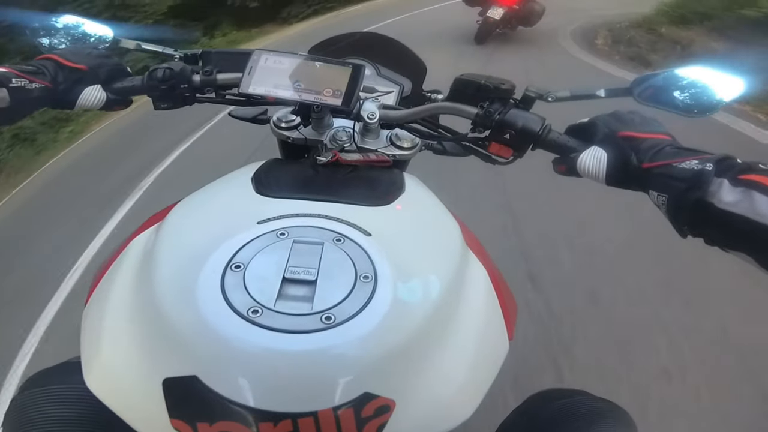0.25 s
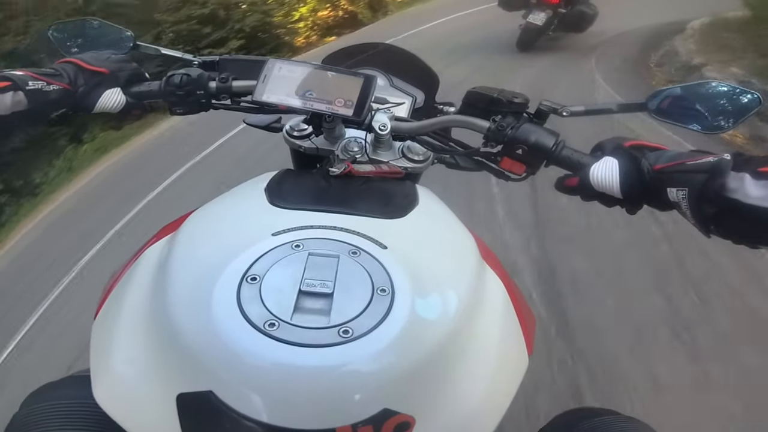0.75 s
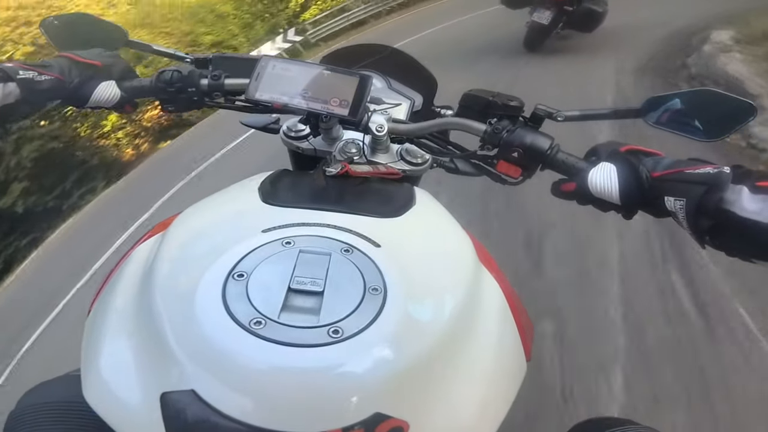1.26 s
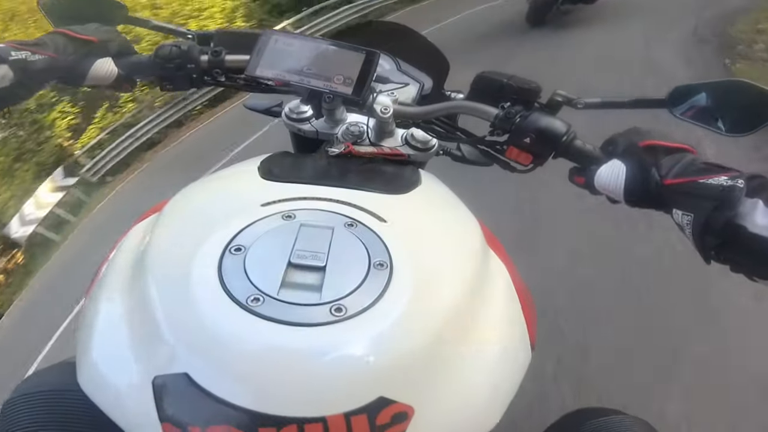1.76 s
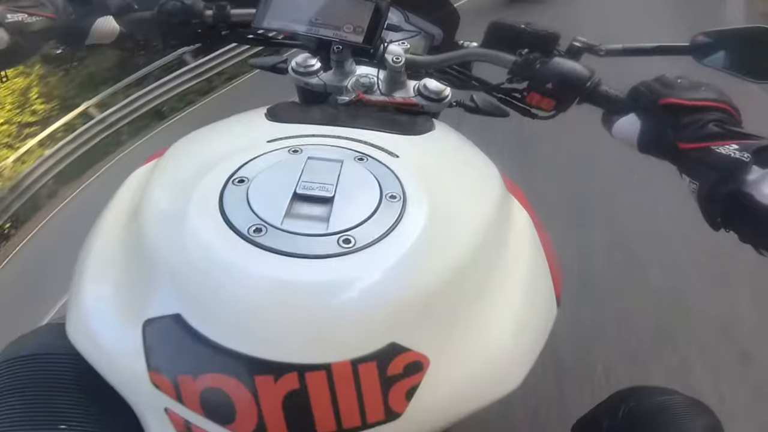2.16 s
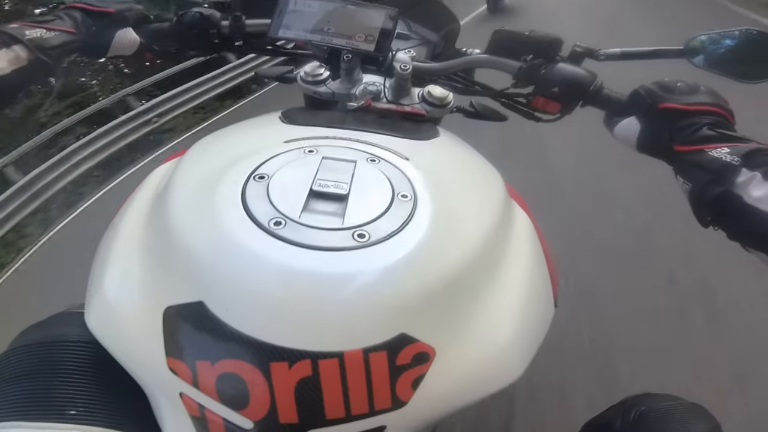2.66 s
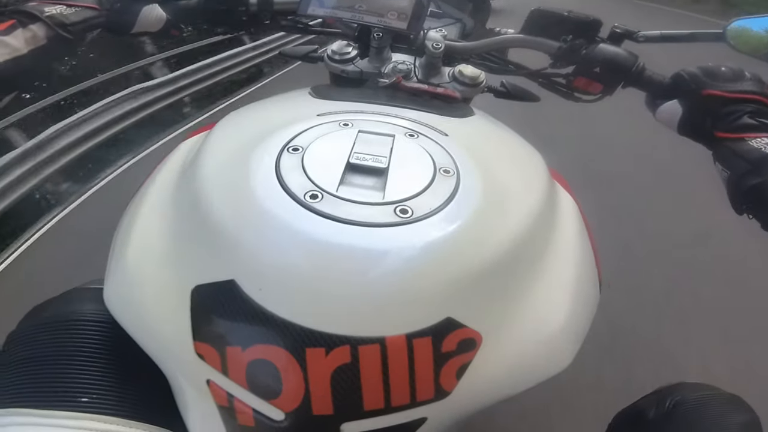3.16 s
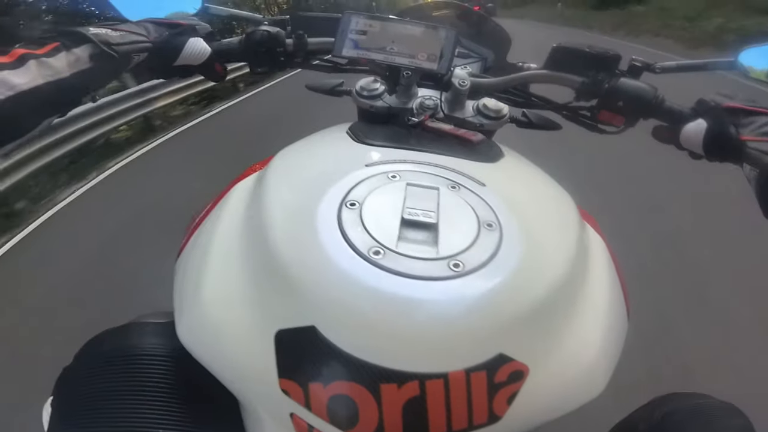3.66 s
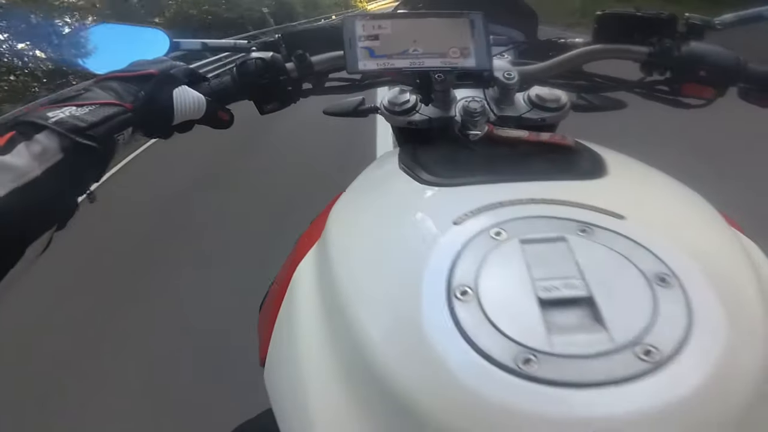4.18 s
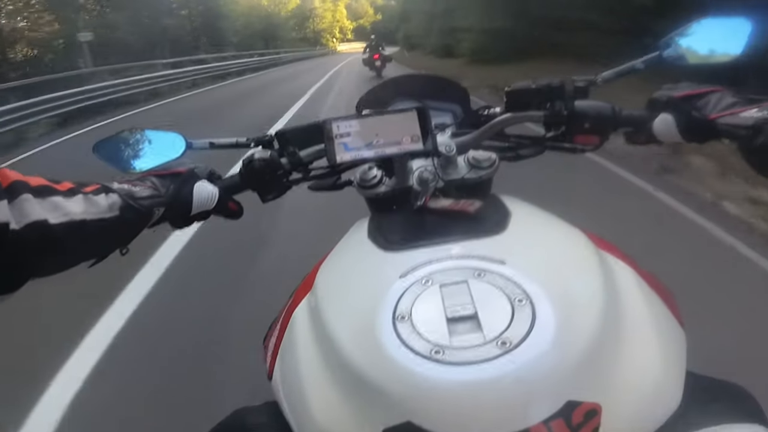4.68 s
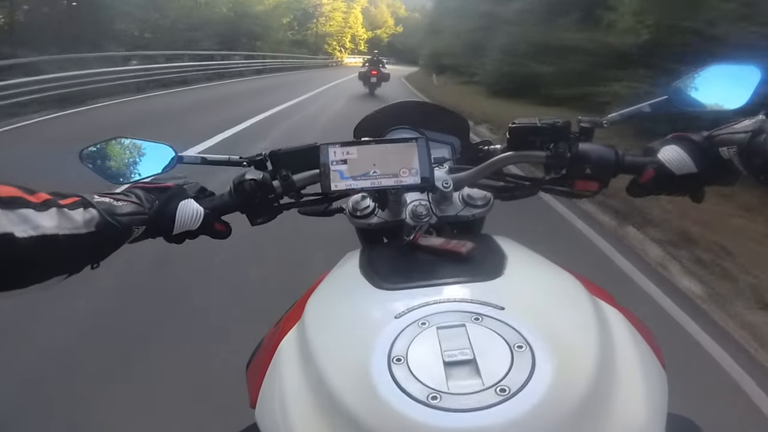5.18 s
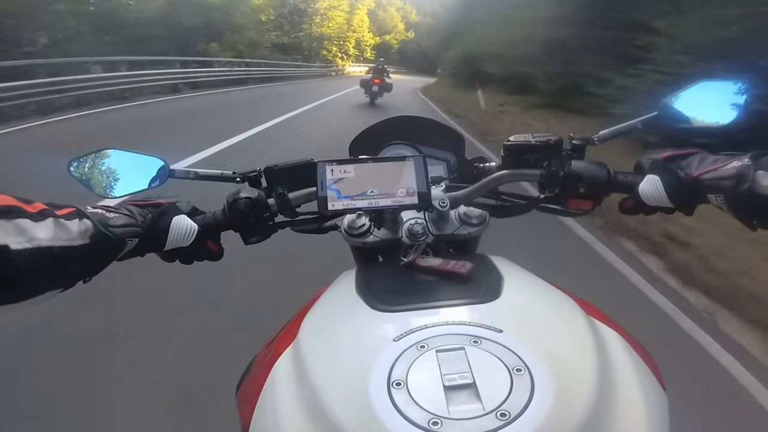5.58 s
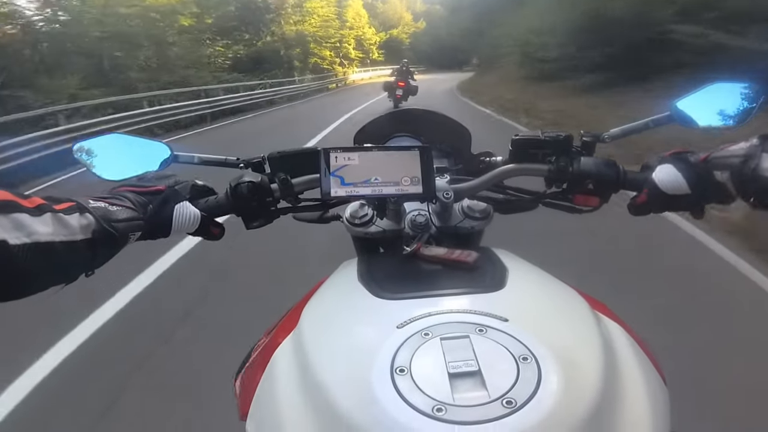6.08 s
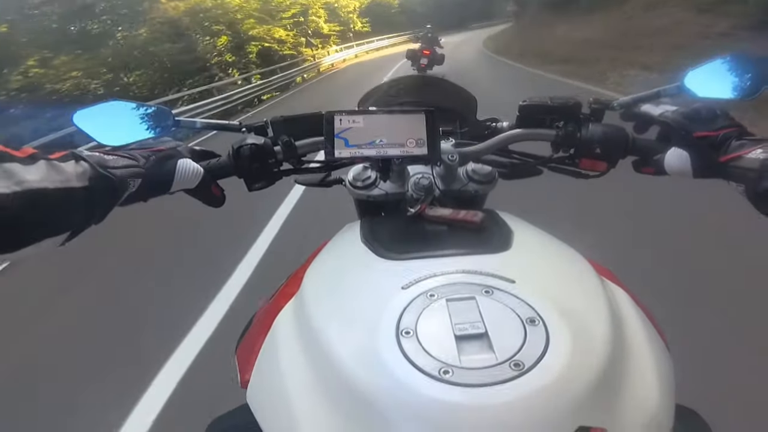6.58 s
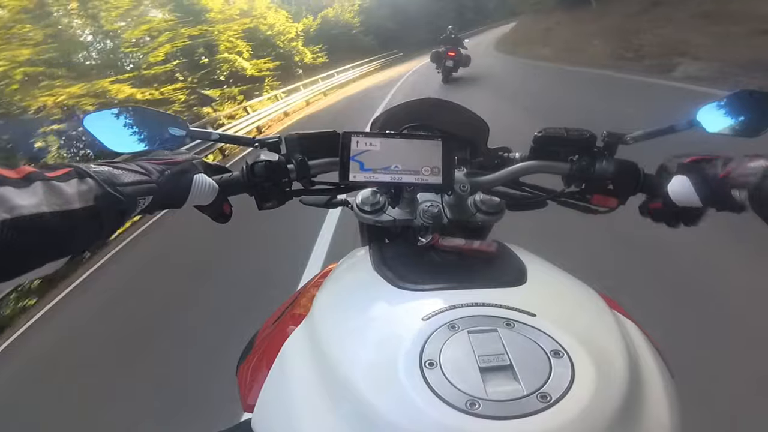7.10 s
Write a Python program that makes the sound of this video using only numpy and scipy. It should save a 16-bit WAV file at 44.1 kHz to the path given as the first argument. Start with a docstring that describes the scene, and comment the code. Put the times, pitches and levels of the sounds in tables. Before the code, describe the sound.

A four-cylinder motorcycle is heard from the rider's chest on a mountain road. It starts coasting at low revs, and from 0.5 to 2 seconds it stumbles and coughs in hollow thumps. Around 2 seconds it pulls hard, with two faint metallic clanks. Its deep intake throb rises steadily in pitch until 5 seconds, overloading the microphone, over valve clatter, hissing air and a growing roar of wind and tyres. A twin-cylinder bike close by accelerates alongside it from about 2 seconds, with exhaust cracks between 3.3 and 4 seconds. A quick run of tiny sharp ticks comes at 4.3 seconds. At 5 seconds the throttle eases with a short burble, and the engine cruises, its pitch sinking slightly, with gear whine more noticeable. From 6.8 seconds the second bike barks and cracks again until the end, just past 7 seconds.

```python
"""A mountain road, heard from the chest of a rider on a four-cylinder V-engine motorcycle.
The bike coasts and coughs through a bend, pulls hard, then cruises on a light throttle. Its intake
throbs through the airbox, loud enough to overload the microphone; valves clatter, gears whine, and
wind and tyres roar underneath. Close by, a twin-cylinder bike barks through its pipe as it
accelerates out of the bend, and again at the end."""
import sys
import numpy as np
from scipy import signal
from scipy.io import wavfile
from scipy.ndimage import uniform_filter1d

SR = 44100
rng = np.random.default_rng(int(sys.argv[2]) if len(sys.argv) > 2 else 0)


def wav_record(signal):
    """Record a signal, one row per channel, as 16-bit PCM in the file named by sys.argv[1]."""
    frames = np.transpose(np.atleast_2d(signal))
    bounded = np.clip(frames, -1, 1)
    # unit amplitude maps onto the largest positive 16-bit level
    quanta = np.round(bounded * 32767).astype(np.int16)
    wavfile.write(sys.argv[1], SR, quanta)


N = 323694
TIME = np.arange(N) / SR

# engine speed: (time [s], four-stroke cycle rate [Hz])
ENGINE_SPEED = [(0, 23.45), (.4, 20.6), (.75, 20.1), (1.2, 20.15), (1.7, 19.95), (2.05, 19.85),
                (2.25, 21.45), (2.58, 24.9), (2.85, 28.2), (3.2, 32.1), (3.52, 35.05), (3.94, 38.55),
                (4.4, 43.1), (4.7, 46.55), (5, 48.25), (5.12, 47.4), (5.42, 47.45), (5.9, 46.19),
                (6.65, 44.61), (7.34, 44.42)]
# the rider's hand: (time [s], load [0 shut, 1 light, 2 wide open])
THROTTLE_LOAD = [(0, 0.091), (.9, 0.19), (1.7, 0.76), (2.1, 1.32), (2.4, 1.72), (3.1, 1.73), (3.55, 2.46),
                 (3.95, 1.68), (4.35, 1.87), (4.7, 1.92), (5, 1.786), (5.08, 1.28), (6.76, 1.015),
                 (6.87, 1.18), (7.34, 1.26)]
# engine mix by throttle: (load [0-2], throb [dB], ragged firing [dB], air rush [dB], clatter [dB])
LOAD_MIX = [(0, -18.5, -28.5, -49, -36), (1, -10.5, -26, -39.5, -37), (2, -5, -19, -29.5, -31.5)]
# intake harmonics of the uneven firing order: (multiple of the cycle rate, shut [dB], light [dB],
# wide open at low revs [dB], at middle revs [dB], at high revs [dB])
INTAKE_HARMONICS = [(1, -8, 17, -6, -9, -5.5), (2, -11, 14, -2, -1.5, -1.5), (3, 26, 2.5, 1, -8.5, 2),
                    (4, 8, 14, -5, -6.5, -7), (5, 19, 11, 5, -1.5, 3), (6, -5, 8.5, 5.5, 4, 2),
                    (7, 9, -7, -1, -4, -7.5), (8, 11.5, 2, 2.5, 2.5, 1.5), (9, 7.5, 7.5, -2, 3, 3),
                    (10, 3.5, -18.5, 1, 2.5, -2.5), (11, 11, -2.5, 3.5, -10, 4), (12, 9.5, -9, -3, 6.5, 3),
                    (13, -3, 1.5, 6, -7.5, 1), (14, 8, -10, 7.5, -1, 5), (15, -12, -3.5, -8, -1, -7),
                    (16, 6, 1, -1.5, 3.5, -2), (17, 0.5, 2.5, 8.5, 14.5, 10.5), (18, -2, 7.5, -1, -1, 3),
                    (19, 2, -6.5, -1, 1, 0), (24, -24, 5, 2, 0, -1), (25, -22, -0.5, 5, 9.5, -14),
                    (26, -18, -2, -6, -5, 1), (33, -14, 0, -3, -2.5, -1)]
# cycle rates of those three wide-open tones: (low [Hz], middle [Hz], high [Hz])
WIDE_OPEN_REVS = [28.8, 32.3, 40.5]
# airbox and pipe resonances: (frequency [Hz], part throttle [dB], wide open [dB])
AIRBOX_COLOUR = [(30.2, -44, -46.5), (66.4, -25, -24), (111, -10.5, -12), (161, -8, -15), (206, 4, -3),
                 (286.5, 5, 1), (383.4, -1.5, -7), (493, -8.5, -15), (582, -16, -21), (845, -30.5, -31.5),
                 (1250, -42.5, -55), (2500, -57.5, -58)]
# thud of incomplete burns: (frequency [Hz], level [dB])
RAGGED_COLOUR = [(30, -49), (65, -31.5), (120, -6.5), (180, -2), (240, 3), (295, 3.5), (380, -4),
                 (480, -12.5), (650, -41.5), (850, -35.5), (1300, -48), (3000, -60.5)]
# stumbles at the lowest revs and on rolling off the throttle:
# (start [s], length [s], fade [s], throb drop [dB], ragged firing [dB])
STUMBLE_SPANS = [(0.587, 1.59, 0.41, 9.5, -25), (5.007, 0.318, 0.039, 10.5, -15.5)]
# intake surges on rolling off: (start [s], length [s], from [Hz], to [Hz], level [dB])
BURBLE_SURGES = [(5.029, 0.047, 235, 255, -11), (5.092, 0.043, 285.1, 258, -12.5),
                 (5.139, 0.094, 230, 238.8, -5.5), (5.23, .04, 210.4, 179.6, -7.5),
                 (5.303, .04, 235, 262, -6.5)]
# coughs at the lowest revs: (time [s], peak [dB])
COUGH_HITS = [(.517, -2.5), (.579, -11.5), (.783, -1), (.794, -8), (.873, -13), (.982, -1.5), (1.177, -2),
              (1.274, -12), (1.51, -6), (1.961, -8), (2.063, -8)]
# their hollow body: (frequency [Hz], level [dB])
COUGH_BODY = [(40, -28), (120, -7), (200, 4.5), (290, 8.5), (400, 3), (620, -34), (850, -11.5), (1050, -25),
              (1400, -44), (3000, -55)]
# knocks of a loose metal part: (time [s], peak [dB])
CLANK_HITS = [(2.208, -21.5), (2.33, -18)]
# its ring: (frequency [Hz], level [dB])
CLANK_BODY = [(800, -23), (1750, -19), (2040, 7.5), (2400, 1), (2900, -24), (3280, 0), (3800, -15),
              (12000, -33)]
# the twin's engine speed: (time [s], cycle rate [Hz])
TWIN_REVS = [(0, 21.13), (1.2, 22.25), (1.65, 24.59), (1.95, 28.01), (2.3, 32.28), (2.8, 37.58),
             (3.2, 41.85), (3.6, 46.41), (4, 51.04), (4.7, 53.72), (5.3, 51.52), (6.85, 51.79),
             (7.1, 52.35), (7.34, 55.8)]
# the twin's faders: (time [s], boom [dB], bark [dB], rattle [dB])
TWIN_MIX = [(0, -53, -63, -46.5), (1.1, -32, -49, -55), (1.7, -27.5, -43, -45), (2.05, -19.5, -27.5, -36),
            (2.3, -17, -19, -36), (3, -24.5, -21.5, -46.5), (3.9, -24, -19.5, -40),
            (4.65, -25, -18.5, -42.5), (5, -29, -41, -45.5), (6.65, -43, -38, -51), (6.82, -20, -33, -42),
            (6.85, -22, -24.5, -43.5), (7.34, -25, -17.5, -35)]
# low end of its pipe: (frequency [Hz], level [dB])
BOOM_COLOUR = [(40, -32), (85, -28.5), (125, 0.5), (210, -3), (290, 1), (420, -4), (560, -7), (1200, -62)]
# midrange bite of its pipe: (frequency [Hz], level [dB])
BARK_COLOUR = [(100, -50), (330, -9), (430, 4), (610, 2), (730, -9), (850, -5.5), (1020, -15), (1250, -16),
               (2000, -29.5), (4000, -47), (12000, -51)]
# ring of its metalwork: (frequency [Hz], level [dB])
RATTLE_COLOUR = [(500, -13), (1400, -7), (2010, 2.5), (2800, -14), (3250, 1.5), (3700, -7.5), (4020, -9),
                 (4600, -17), (5100, -8), (5600, -20), (6170, -10.5), (7300, -26.5), (9500, -16),
                 (10400, -13), (11800, -16.5), (13100, -15.5), (15000, -20)]
# its hardest firings, cracking out of the pipe: (time [s], peak [dB])
CRACK_HITS = [(1.861, -23), (2.033, -19.5), (2.107, -17), (3.286, -8), (3.705, -4), (3.848, -1),
              (3.889, -6), (3.929, -8), (6.851, -5), (6.909, -10), (7.044, -8), (7.139, -7), (7.158, -11)]
# their body: (frequency [Hz], level [dB])
CRACK_BODY = [(100, -32), (350, -3), (600, 14), (900, 5), (1400, -24), (4000, -32)]
# air drawn past the throttle plates: (frequency [Hz], level [dB])
RUSH_COLOUR = [(250, 0), (600, 12.5), (1000, -5), (2200, -17.5), (3400, -21), (4500, -13.5), (6200, -15),
               (8000, -17), (10500, -14.5), (15000, -21.5)]
# ring of the valve train and engine cases: (frequency [Hz], level [dB])
CASE_COLOUR = [(400, 4.5), (680, -12.5), (815, 6.5), (960, -10), (1300, -15.5), (1620, -4), (1950, -3.5),
               (2350, -5), (2850, -18), (3300, -5.5), (3750, -21), (4020, -11), (4300, -21), (5600, -28.5),
               (6100, -21), (6700, -32.5), (9600, -27.5), (10500, -22.5), (11300, -24), (15000, -29)]
# gear tones: (multiple of the cycle rate, relative level [dB])
GEAR_MESHES = [(40, -5.5), (50, -1.5), (55, -3), (80, 3), (120, 4), (160, -9), (200, -1)]
# gear whine fader, highest once the throttle is eased: (time [s], level [dB])
WHINE_LEVEL = [(0, -53), (1, -51.5), (2.2, -53), (4.8, -38), (5.05, -34.5), (5.9, -33), (6.6, -36.5),
               (7.34, -46)]
# a brief run of sharp ticks: (time [s], peak [dB])
TICK_HITS = [(4.3346, -25), (4.3398, -16), (4.3451, -12.5), (4.3505, -22), (4.3558, -13.5), (4.3612, -19)]
# their bright snap: (frequency [Hz], level [dB])
TICK_BODY = [(1000, -28), (2400, 15), (3400, 8), (7000, -31), (9500, 2), (12000, 6), (15000, -23)]
# bed of wind and tyres: (frequency [Hz], level [dB])
WIND_COLOUR = [(20, -12), (50, -21), (150, 4), (300, -6), (500, -8.5), (800, -5), (1200, -17),
               (2500, -19.5), (5000, -38), (15000, -54)]


def intake_throb(turns, hz, load, lope, wobble_turns=0.0016, flutter_db=0.7, size=2048):
    """One cycle of intake pulses loops through the airbox; load and revs crossfade five tones."""
    multiples, *tones = np.transpose(INTAKE_HARMONICS)
    box_hz, part, wide = np.transpose(AIRBOX_COLOUR)
    crank = turns + wobble_turns * wander(60)  # the crank never turns quite evenly
    shut, light, pulling = (np.interp(load, [0, 1, 2], corner) for corner in np.eye(3))
    shares = [shut, light] + [pulling * np.interp(hz, WIDE_OPEN_REVS, corner) for corner in np.eye(3)]
    blend = 0
    for share, tone_db, box_db in zip(shares, tones, (part, part, wide, wide, wide)):
        spectrum = np.fft.rfft(burst(np.interp(np.arange(size // 2 + 1), multiples, tone_db)))
        spectrum[0] = spectrum[48:] = 0  # harmonics 1 to 47 only
        cycle = unit(np.fft.irfft(spectrum))
        pulsation = np.interp(crank, np.arange(size) / size, cycle, period=1)
        blend = blend + share * through(pulsation, np.c_[box_hz, box_db])
    throb = blend * undb(flutter_db * wander(70)) * gulps(turns, lope)
    return throb / np.sqrt(smooth(throb ** 2, 4000))  # iron out slow swells


def gulps(turns, depth, crest_turns=0.073):
    """Gain swell as the engine draws one broad gulp of air per cycle."""
    return 1 + depth * np.cos(2 * np.pi * (turns - crest_turns))


def ragged_firing(turns, hz, turbulence=0.026):
    """Incomplete burns kick the pipe at random strengths."""
    kicks = firings(turns, scatter_db=4.5) * np.sqrt(hz.min() / hz)
    return through(kicks + turbulence * rng.standard_normal(N), RAGGED_COLOUR)


def stumble(throb_db, ragged_db):
    """In a stumble the even throb ducks and ragged firings take over."""
    for start, length, fade, drop_db, rough_db in STUMBLE_SPANS:
        inside = gate(start, length, fade)
        throb_db = throb_db - inside * drop_db
        ragged_db = ragged_db + inside * (rough_db - ragged_db)
    return throb_db, ragged_db


def burble(fade_s=0.023, waver=0.01504):
    """Each intake surge booms in the airbox at a sliding pitch."""
    surges = 0
    for start, length, from_hz, to_hz, db in BURBLE_SURGES:
        hz = np.interp(TIME, [start, start + length], [from_hz, to_hz]) * (1 + waver * wander(60))
        boom = np.sin(2 * np.pi * np.cumsum(hz) / SR)
        surges = surges + undb(db) * gate(start, length, fade_s) * boom
    return surges


def coughs():
    """The engine coughs in hollow thumps at its lowest revs."""
    return strikes(COUGH_HITS, COUGH_BODY)


def clanks():
    """A loose metal part rings under the first hard pull."""
    return strikes(CLANK_HITS, CLANK_BODY)


def twin_bike(weak_db=-6, scatter_db=2.9, wobble_turns=0.0016, gas=0.0061, puff_s=0.018, rattle_s=0.009):
    """Weak and strong firings boom and bark in a twin's pipe and shake its metal: exhaust, two rattles."""
    hz, = curves(TWIN_REVS)
    boom_db, bark_db, rattle_db = curves(TWIN_MIX)
    weak_at, strong_at, shakes_at = .79, .98, (.8, .04)  # places in the cycle
    turns = np.cumsum(hz) / SR
    crank = turns + wobble_turns * wander(50)
    weak, strong = (firings(crank, scatter_db, [place], signs=[1]) for place in (weak_at, strong_at))
    pulses = (undb(weak_db) * weak + strong) * np.sqrt(hz.min() / hz)
    puffs = gas * np.exp(-((turns - strong_at) % 1) / hz / puff_s) * rng.standard_normal(N)
    boom = undb(boom_db) * through(pulses, BOOM_COLOUR)
    bark = undb(bark_db) * through(pulses + puffs, BARK_COLOUR)
    shakes = sum(np.exp(-((turns - place) % 1) / hz / rattle_s) for place in shakes_at)
    rattles = [undb(rattle_db) * through(shakes * noise, RATTLE_COLOUR)
               for noise in rng.standard_normal((2, N))]
    return boom + bark + strikes(CRACK_HITS, CRACK_BODY), rattles


def air_rush(turns, lope):
    """Air hisses past the throttle plates with each gulp."""
    return through(gulps(turns, lope) * rng.standard_normal(N), RUSH_COLOUR)


def valve_clatter(turns, tap_db=-1, churn_depth_db=2.5):
    """Valves tap the cases over an uneven churn of chains and bearings."""
    taps = undb(tap_db) * unit(firings(2 * turns, scatter_db=4.0))
    churn = undb(churn_depth_db * wander(80)) * rng.standard_normal(N)
    return through(taps + churn, CASE_COLOUR)


def gear_whine(turns, hz, backlash=0.0046, flutter_db=3, cutoff_hz=2500):
    """Gear teeth sing at multiples of the engine speed, wavering with their play."""
    whine = 0
    for teeth, db in GEAR_MESHES:
        mesh = np.sin(2 * np.pi * teeth * turns + backlash * teeth * wander(35))
        muffling = 1 + (teeth * hz / cutoff_hz) ** 6  # the cases dull the highest tones
        whine = whine + mesh * undb(db + flutter_db * wander(12)) / muffling
    return unit(whine)


def ticks():
    """Tiny hard snaps, right at the microphone, that die at once."""
    return strikes(TICK_HITS, TICK_BODY)


def wind_and_tyres(hz, load, base_db=-27, full_revs_hz=31.3, db_per_octave=20, db_per_load=3):
    """The roar builds steeply with the revs, then levels off; it is stronger under drive."""
    roar_db = base_db + db_per_octave * np.minimum(np.log2(hz / full_revs_hz), 0) + db_per_load * load
    air = rng.standard_normal(N)
    gust_db = 1.87 * wander(3.18) - 0.5 * wander(35)  # slow swells, quick buffets
    return undb(roar_db) * through(air * undb(gust_db), WIND_COLOUR)


def firings(turns, scatter_db, places=(0, .25, .59, .84), signs=(-1, 1)):
    """Pulses of random strength at these places in the cycle; by default the V's uneven spacing."""
    pulses = np.zeros(N)
    for place in places:
        at = np.flatnonzero(np.diff(np.floor(turns - place)) > 0)
        strength = undb(scatter_db * np.clip(rng.standard_normal(len(at)), -2, 1))
        pulses[at] += strength * rng.choice(signs, len(at))
    return pulses


def strikes(hits, colour):
    """One blow into a body per (time [s], peak [dB]) row."""
    blows, response = np.zeros(N), ring(colour)
    for s, db in hits:
        blows[int(s * SR)] += undb(db)
    return signal.fftconvolve(blows, response / np.abs(response).max())[:N]


def through(x, colour):
    """Play a sound through a body; rms 1."""
    return unit(signal.fftconvolve(x, ring(colour))[:N])


def ring(colour, size=4096):
    """Impulse response of a body with this (frequency [Hz], level [dB]) colour."""
    hz, db = np.transpose(colour)
    return burst(np.interp(np.log(np.linspace(1, SR / 2, size + 1)), np.log(hz), db))


def burst(db):
    """The tightest causal wave with these evenly spaced spectral levels."""
    cepstrum = np.fft.irfft(np.log(undb(db)))
    half = len(cepstrum) // 2
    cepstrum[1:half] *= 2
    cepstrum[half + 1:] = 0
    return np.fft.irfft(np.exp(np.fft.rfft(cepstrum)))


def wander(rate_hz):
    """Smooth random drift; rms 1."""
    hold = int(SR / rate_hz)
    steps = np.repeat(rng.standard_normal(N // hold + 1), hold)
    return unit(smooth(steps, hold)[:N])


def smooth(x, samples):
    """Round off with two moving averages."""
    return uniform_filter1d(uniform_filter1d(x, samples), samples)


def gate(start, length, fade):
    """A window with a linear fade centred on each edge; all in seconds."""
    return np.clip(.5 + np.minimum(TIME - start, start + length - TIME) / fade, 0, 1)


def curves(table):
    """One automation curve for each column after the time."""
    times, *columns = np.transpose(table)
    return [np.interp(TIME, times, column) for column in columns]


def undb(db):
    """Decibels to gain."""
    return 10 ** (np.asarray(db) / 20)


def unit(x):
    """Scale to an rms of 1."""
    return x / np.sqrt(np.mean(x ** 2))


def scene(spread=0.39, lope_depth=0.16, lumpy_hz=24, even_hz=35, cruise_hz=46, throb_db_per_octave=3.5):
    """Both bikes and the wind at two close microphone ports; revs and throttle ride the engine mix."""
    hz, = curves(ENGINE_SPEED)
    load, = curves(THROTTLE_LOAD)
    whine_db, = curves(WHINE_LEVEL)
    turns = .77 + np.cumsum(hz) / SR  # engine cycles, starting partway through one
    loads, *levels = np.transpose(LOAD_MIX)
    throb_db, ragged_db, rush_db, clatter_db = (np.interp(load, loads, db) for db in levels)
    throb_db += throb_db_per_octave * np.log2(hz / cruise_hz)
    throb_db, ragged_db = stumble(throb_db, ragged_db)
    # under load at low revs the gulps stand apart; at high revs they merge
    lope = lope_depth * load / 2 * np.interp(hz, [lumpy_hz, even_hz], [1, 0])
    engine = undb(throb_db) * intake_throb(turns, hz, load, lope)
    engine += undb(ragged_db) * ragged_firing(turns, hz) + burble() + coughs() + clanks()
    twin, rattles = twin_bike()
    centre = engine + twin + undb(whine_db) * gear_whine(turns, hz) + wind_and_tyres(hz, load)
    # the small noises also bounce off tank and rider, and so differ between the ports
    direct, bounced = (
        undb(rush_db) * air_rush(turns, lope) + undb(clatter_db) * valve_clatter(turns) + rattle
        for rattle in rattles)
    return centre + direct + spread * bounced * np.array([[1], [-1]])


def record(dry, ceiling=0.36, knee=6, leak=0.62, hiss_db=-66, top_width=0.34, top_hz=15400):
    """The microphone sheds rumble and overloads with flat tops; ticks join clean, and the top is cut."""
    def filtered(x, kind, hz):
        return signal.sosfiltfilt(signal.butter(2, hz, kind, fs=SR, output="sos"), x)

    dry = filtered(dry, "high", hz=55)
    oversampled = signal.resample_poly(dry, 2, 1, axis=1)
    flattened = oversampled / (1 + np.abs(oversampled / ceiling) ** knee) ** (1 / knee)
    clipped = signal.resample_poly(flattened, 1, 2, axis=1)
    treble = filtered(dry - clipped, "high", hz=1500)  # some still rides on the flat tops
    left, right = clipped + leak * treble + undb(hiss_db) * rng.standard_normal((2, N))
    right = np.roll(right, 2)  # two samples late
    side = filtered((left - right) / 2, "high", hz=1100)  # the bass stays mono
    dull_side = filtered(side, "low", hz=7000)
    side = dull_side + top_width * (side - dull_side)  # the housing narrows the top octave
    ports = (left + right) / 2 + side * np.array([[1], [-1]]) + ticks()
    return signal.sosfilt(signal.ellip(10, .1, 80, top_hz, fs=SR, output="sos"), ports)


dry = scene()
out = record(dry)
wav_record(out)
```